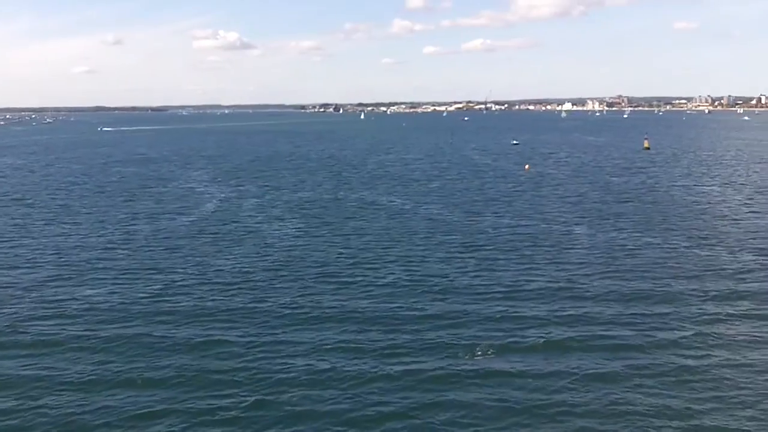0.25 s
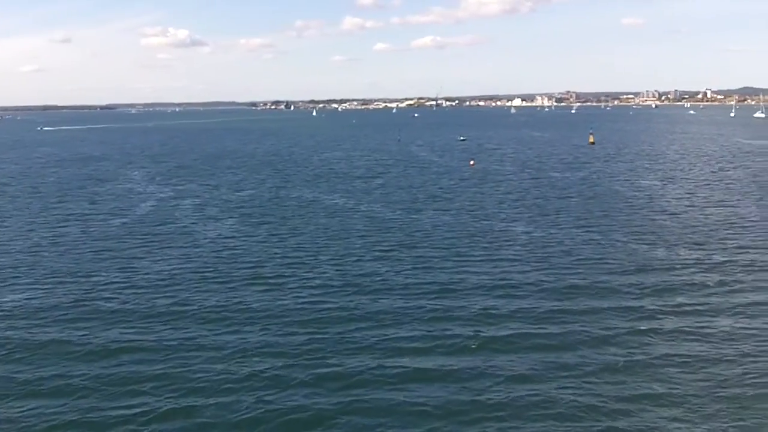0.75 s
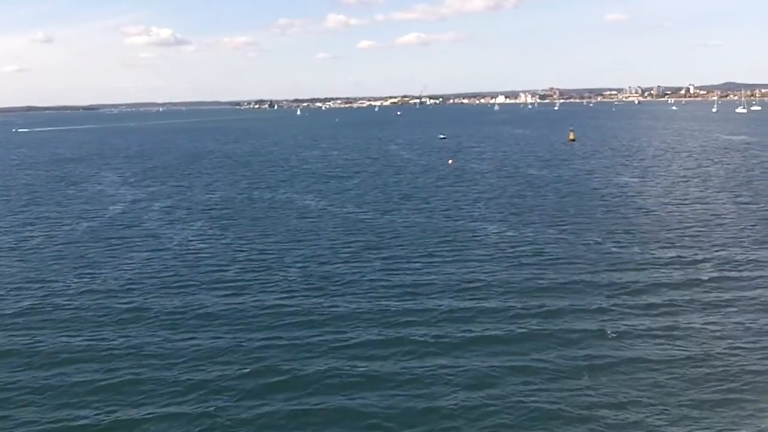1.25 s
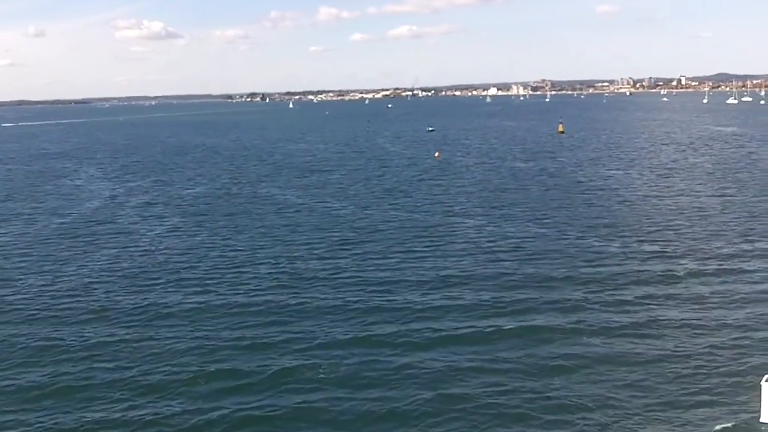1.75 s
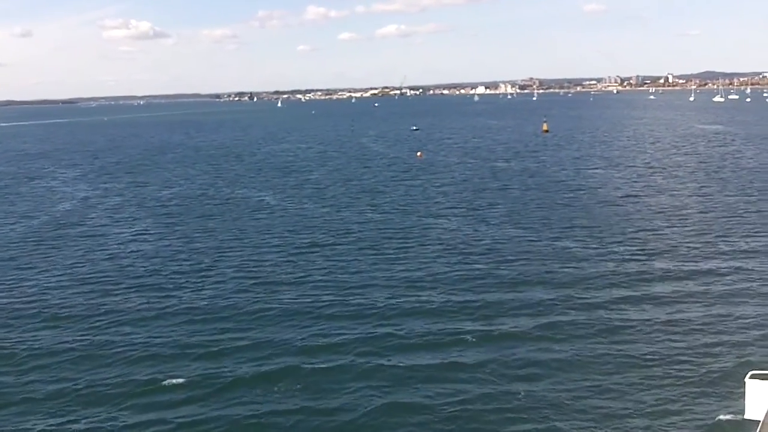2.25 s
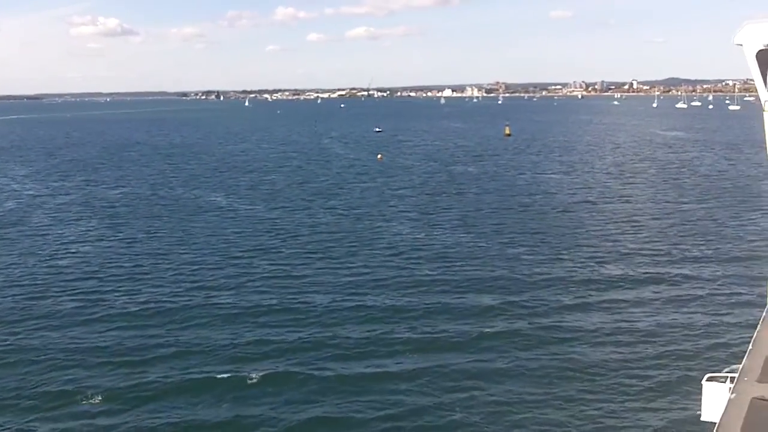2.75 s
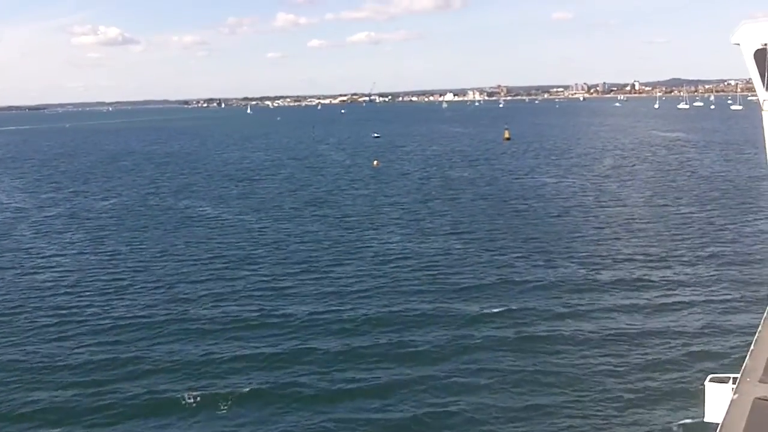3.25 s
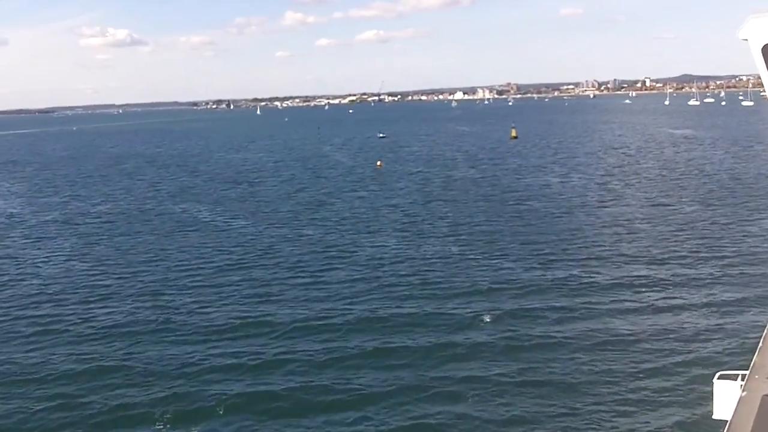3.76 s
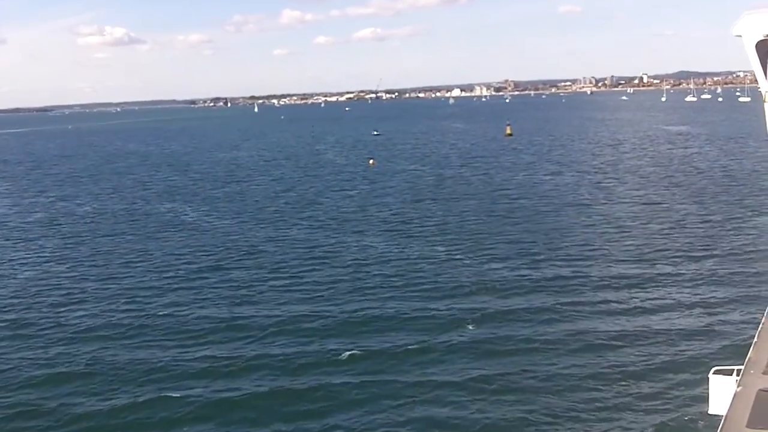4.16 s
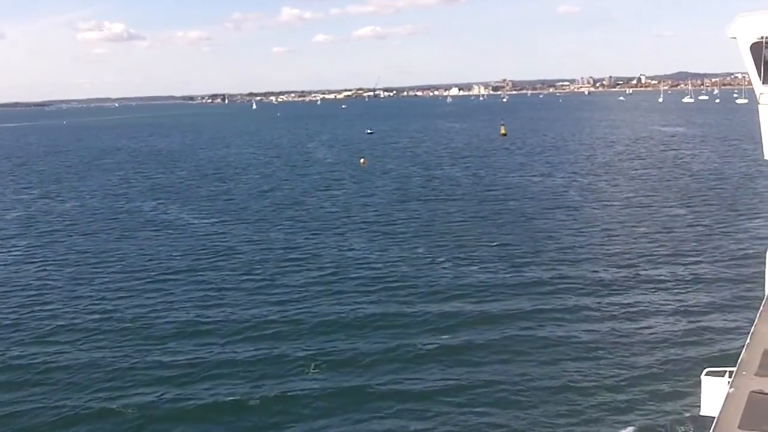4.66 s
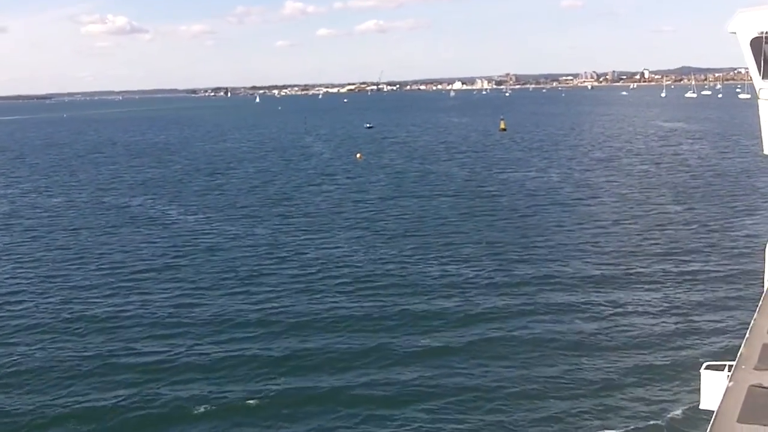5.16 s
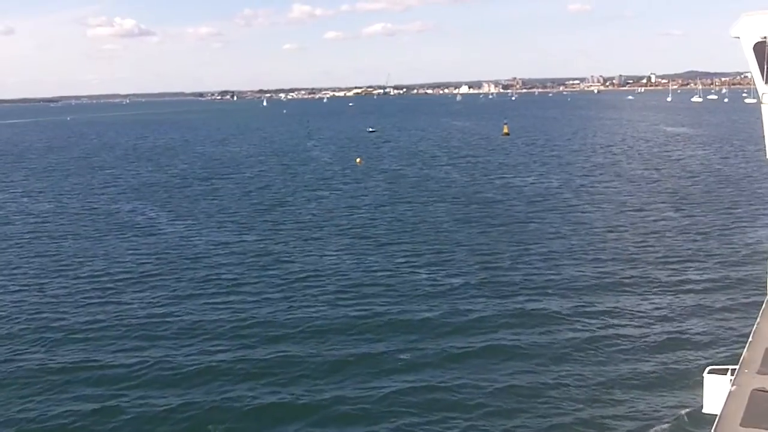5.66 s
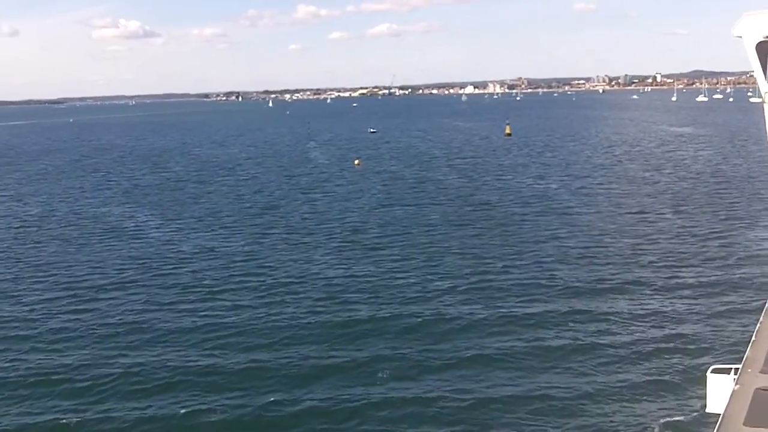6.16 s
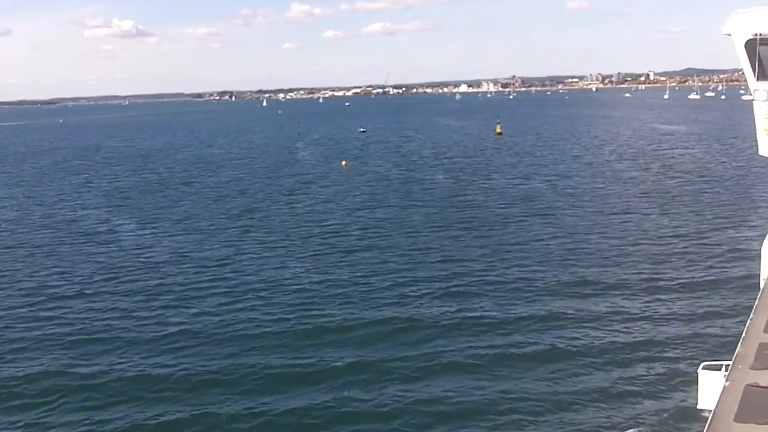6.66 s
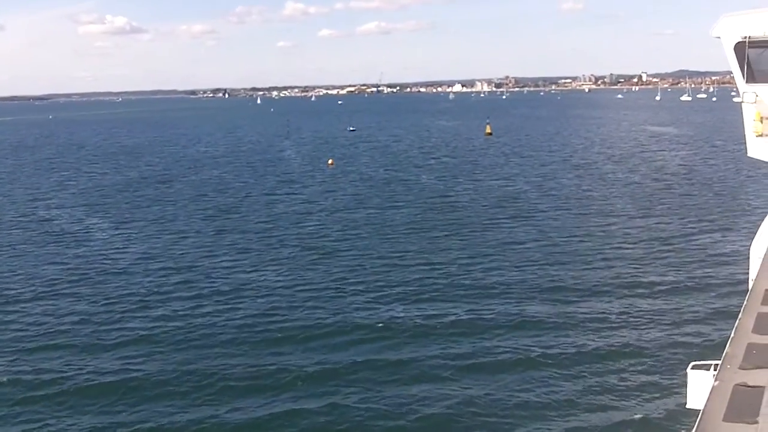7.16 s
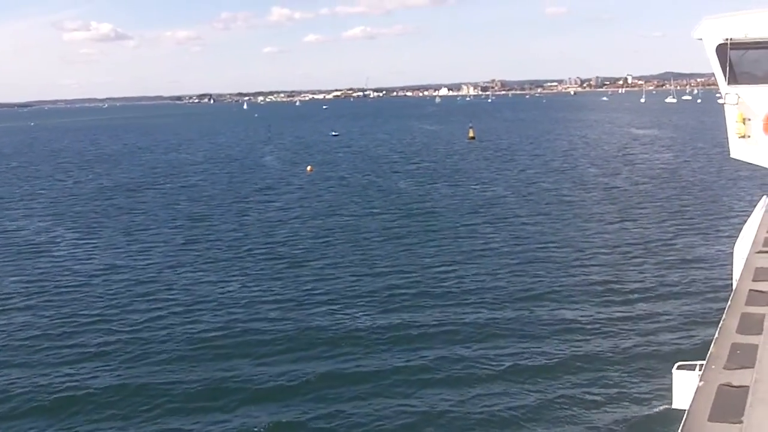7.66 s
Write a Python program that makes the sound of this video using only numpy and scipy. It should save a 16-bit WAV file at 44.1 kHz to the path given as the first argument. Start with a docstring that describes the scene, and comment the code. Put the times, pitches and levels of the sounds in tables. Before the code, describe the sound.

On the deck of a fast ferry, engines drone and a fan hums with a flutter while wind rumbles and thumps over rushing air and water.

```python
"""Side deck of a fast ferry

On the open side deck of a fast ferry crossing calm water, machinery drones as hum lines and shaped noise.
A ten-bladed fan hums in fluttering harmonics; air and wake are noise coloured by an echo off a steel wall.
Wind is lumpy low noise on the microphone, with heavier thumps; a brief, faint moan glides upward.
Later come short spurts of hiss, like spray: bursts of grainy treble noise with faint tails."""
import sys
import numpy as np
from scipy import signal
from scipy.fft import rfft, irfft, next_fast_len
from scipy.io import wavfile
from scipy.ndimage import uniform_filter1d

SR = 44100
rng = np.random.default_rng(int(sys.argv[2]) if len(sys.argv) > 2 else 0)


def transcribe(u):
    """Save the signal u as a 16-bit wav file named by the first command-line argument.

    u: samples, shape (n,) or (channels, n), limited to [-1, 1]; the rate is SR.
    q: integer samples, one column per channel.
    """
    v = np.clip(np.atleast_2d(u).T, -1, 1)
    q = np.round(v * 32767).astype(np.int16)
    wavfile.write(sys.argv[1], SR, q)


N = 349272  # length [samples]


def from_db(db):
    """Decibels to gain."""
    return 10 ** (np.asarray(db) / 20)


def rms_one(x):
    """Scale to an rms of 1."""
    return x / np.sqrt(np.mean(x ** 2) + 1e-20)


def in_time(rows):
    """Draw a (time, value) curve as straight lines, one value per sample."""
    time_s, value = np.transpose(rows)
    return np.interp(np.arange(N) / SR, time_s, value)


def bell(peak_s, half_s):
    """A smooth rise and fall around one moment, down to 1/e at half_s from the peak."""
    return np.exp(-((np.arange(N) / SR - peak_s) / half_s) ** 2)


def noise(gain_at):
    """Random noise whose amplitude follows a function of frequency; rms 1."""
    size = next_fast_len(N)
    hz = np.maximum(np.arange(size // 2 + 1) * SR / size, 1)
    spectrum = rfft(rng.standard_normal(size)) * gain_at(hz)
    return rms_one(irfft(spectrum, size)[:N])


def coloured(spectrum):
    """Noise of a given colour, falling steeply beyond the ends of the table; rms 1."""
    points, level_db = np.transpose(spectrum)

    def gain_at(hz):
        inside = np.minimum(hz / points[0], points[-1] / hz)
        ends = np.minimum(1, inside) ** 4
        return from_db(np.interp(np.log(hz), np.log(points), level_db)) * ends

    return noise(gain_at)


def drift(rate_hz):
    """Slow random movement with a spread of about 1: white noise through two equal low-pass poles."""
    step = 40  # samples between drawn points
    settle = 2000  # points dropped while the filter settles
    pole = np.exp(-2 * np.pi * rate_hz * step / SR)
    draws = rng.standard_normal(N // step + settle + 2)
    slow = signal.lfilter([1], [1, -2 * pole, pole ** 2], draws)[settle:]
    return np.interp(np.arange(N) / step, np.arange(len(slow)), rms_one(slow))


def tone(hz, flutter, rate_hz):
    """A line heard through moving air: a steady part plus a scattered part; rms about 1."""
    share = np.clip(flutter, 0, 1)
    phase = 2 * np.pi * (np.cumsum(hz) / SR + rng.random())
    steady = np.sqrt(2 * (1 - share ** 2)) * np.sin(phase)
    scattered = drift(rate_hz) * np.sin(phase) + drift(rate_hz) * np.cos(phase)
    return steady + share * scattered


def evened(x, steady_share):
    """Even out the chance swings of a noise's level, wholly or in part; rms 1."""
    own_level = np.sqrt(uniform_filter1d(x ** 2, size=SR // 8) + 1e-9)
    return rms_one(x / own_level ** np.clip(steady_share, 0, 1))


def carried(swell_db, level_db, follows):
    """Gain of a broad layer: it follows a share of the common swell and wavers a little on its own."""
    return from_db(level_db + follows * swell_db + 0.35 * drift(7.5))


def wall(x, spacing_hz, share):
    """One short echo lays evenly spaced humps over the spectrum."""
    n = np.arange(N)
    echo = np.interp(n - SR / spacing_hz, n, x, left=0)
    return rms_one(x + share * echo)


def machinery(speed, swell_db):
    """Hum lines of shafts and engines, moving in step with the fan speed, in broad drone and roar noise."""
    # hum of shafts and engines: (frequency at mean speed [Hz], level [dB])
    hum_lines = [(39.5, -32), (49.4, -35), (83, -40.5), (100.3, -45.5), (148.1, -45.5), (150.3, -42.5),
                 (197.5, -40.5), (224, -40.5), (233.5, -47), (246.9, -45.5), (266.3, -48.5), (296.2, -48.5),
                 (345.6, -48.5), (444.4, -52.5), (543, -54.5), (672, -56)]
    # colour of the low drone: (frequency [Hz], relative level per Hz [dB])
    drone_colour = [(40, -19.5), (65, -7.5), (90, -3), (112, -1), (135, -7), (170, -1.5), (205, -5),
                    (230, -5.5), (270, -6), (310, -11.5), (420, -39.5)]
    # colour of the roar above it: (frequency [Hz], relative level per Hz [dB])
    roar_colour = [(220, -31), (305, -1), (345, -1.5), (385, 1.5), (455, 1), (520, -3), (570, -5),
                   (670, -6), (760, -10), (880, -14), (1200, -27)]
    relative_speed = speed / speed.mean()
    hum = sum(from_db(db) * tone(hz * relative_speed, flutter=0.36, rate_hz=1.54) for hz, db in hum_lines)
    drone = evened(coloured(drone_colour), steady_share=0.4)
    drone = carried(swell_db, level_db=-28.5, follows=1.28) * drone
    roar = carried(swell_db, level_db=-34, follows=0.86) * coloured(roar_colour)
    return hum + drone + roar


def fan(speed, swell_db):
    """Blade tones flutter together and alone; moving air shifts their phases, intake eddies roughen them."""
    # blade tones: (multiple of the blade rate, usual level [dB], phase wander [rad],
    # roughness [spread of the gain before levelling, 0-1])
    blade_tones = [(1, -38.5, 0.33, 0.12), (2, -51, 0.45, 0.4), (3, -55, 0.44, 0.35), (4, -52.5, .65, 0.38),
                   (5, -53, 0.53, 0.48), (6, -58, .8, 0.8), (7, -66.5, 0.98, 0.8), (8, -79.5, .7, .4),
                   (9, -80.5, .7, .4), (12, -81, .5, .3)]
    # swells of the lowest blade tone: (time [s], level added [dB])
    first_tone = [(0.0, -3.5), (0.45, 0.5), (0.8, -2), (1.6, 0), (2.1, 0.5), (2.5, 1.5), (3.4, 1),
                  (3.85, -4), (4.35, -1), (4.75, -4), (4.95, -1.5), (5.3, 2), (5.82, 0.5), (5.97, -5),
                  (6.15, -0.5), (6.8, 4), (7.2, 1), (7.9, 1.5)]
    # swells of the second blade tone: (time [s], level added [dB])
    second_tone = [(0.0, -1), (0.45, 2.5), (1.1, 3.5), (1.65, 5.5), (2.5, -5), (2.95, -3), (3.08, 2),
                   (3.85, 3), (5.0, 2), (6.5, 3), (6.72, -3), (7.2, 6.5), (7.35, 8.5), (7.45, 0), (7.9, -2)]
    # swells of the third blade tone: (time [s], level added [dB])
    third_tone = [(0.0, 7), (0.45, 5.5), (0.63, -4), (0.9, 6.5), (1.2, 5), (1.6, 0), (2.1, 6.5), (2.5, 2),
                  (3.15, -0.5), (3.4, -2), (4.8, -1.5), (5.2, 1), (5.6, 1.5), (6.4, 1.5), (7.2, 0),
                  (7.9, 0)]
    blades = 10
    flutter_hz, eddy_hz = 6.5, 45
    common_flutter_db, own_flutter_db = 1.05, 1.1  # shared by all tones; each alone

    own_db = {1: in_time(first_tone), 2: in_time(second_tone), 3: in_time(third_tone)}
    blade_phase = 2 * np.pi * blades * np.cumsum(speed) / SR
    tones = np.zeros(N)
    for multiple, db, wander, rough in blade_tones:
        k = round(multiple)
        eddies = (1 + rough * drift(eddy_hz)) / np.sqrt(1 + rough ** 2)
        phase = k * blade_phase + 2 * np.pi * rng.random() + wander * drift(flutter_hz)
        line = np.sqrt(2) * np.sin(phase)
        level_db = db + own_db.get(k, 0) + own_flutter_db * drift(flutter_hz)
        tones += from_db(level_db) * eddies * line
    # the tones follow most of the common swell
    together_db = 0.91 * swell_db + common_flutter_db * drift(flutter_hz)
    return from_db(together_db) * tones


def wake(swell_db):
    """Air and churned water as shaped noise, mirrored by the wall, with a fine flickering hiss on top."""
    # colour of the rush: (frequency [Hz], relative level per Hz [dB])
    rush_colour = [(600, -15), (800, -3.5), (910, 6), (990, 9.5), (1070, 8), (1180, -3.5), (1300, 2.5),
                   (1500, -0.5), (1750, 0.5), (2000, -0.5), (2500, -2), (3000, -5), (3500, -9), (4200, -21),
                   (6000, -47.5)]
    # colour of the fine hiss: (frequency [Hz], relative level per Hz [dB])
    hiss_colour = [(2500, -12.5), (3800, -0.5), (5000, -2.5), (6200, -5), (7400, -14), (8800, -20.5),
                   (10500, -25.5), (13000, -35), (15000, -36)]
    rush = wall(coloured(rush_colour), spacing_hz=318.4, share=0.27)
    hiss = coloured(hiss_colour) * from_db(0.65 * drift(25))
    rush = carried(swell_db, level_db=-41.5, follows=0.83) * rush
    hiss = carried(swell_db, level_db=-62, follows=0.86) * hiss
    return rush + hiss


def wind(steady_share):
    """Headwind surges, drops and small random buffets shape rumble on the microphone, over a deep heave."""
    # surges and drops of the headwind: (time of the peak or dip [s], level added before levelling [dB])
    gusts = [(0.06, -3.5), (0.459, -1.5), (0.74, 3.5), (1.26, 3.5), (1.49, -7.5), (1.7, 2.5), (2.1, 6.5),
             (2.5, -1), (2.8, 0.5), (3.35, 3), (3.619, -5), (3.82, 3), (4.0, 2.5), (4.56, -5), (4.68, -8.5),
             (5.02, -2), (5.15, -7), (5.31, 5.5), (5.6, 0), (6.07, 0), (6.35, -9.5), (6.65, -4),
             (7.06, -3.5), (7.38, 5), (7.55, -5), (7.67, 3), (7.85, 6.5)]
    # colour of the rumble: (frequency [Hz], relative level per Hz [dB])
    rumble_colour = [(21, -1.5), (30, -6), (45, -11), (60, -16), (90, -27.5), (200, -50.5)]
    # colour of the slowest pressure swings: (frequency [Hz], relative level per Hz [dB])
    heave_colour = [(4, -5.5), (11, -2.5), (17, -2.5)]
    gusts_db = sum(db * bell(s, half_s=0.041) for s, db in gusts)
    buffets = from_db(gusts_db + 0.5 * drift(7.4))
    rumble = rms_one(buffets * evened(coloured(rumble_colour), steady_share))
    return from_db(-25) * rumble + from_db(-25.5) * coloured(heave_colour)


def thumps():
    """The hardest buffets thump on the microphone, reaching higher up the bass than the even rumble."""
    # hard buffets: (time of the peak [s], level [dB])
    hard_buffets = [(0.53, -24.5), (2.1, -24.5), (3.35, -22), (3.81, -22.5), (3.95, -23.5), (4.4, -32),
                    (5.3, -21), (7.35, -17)]
    # colour of a thump: (frequency [Hz], relative level per Hz [dB])
    thump_colour = [(35, -9), (60, 4), (85, 3), (120, -23)]
    envelope = sum(from_db(db) * bell(s, half_s=0.035) for s, db in hard_buffets)
    return envelope * evened(coloured(thump_colour), steady_share=0.59)


def moan():
    """A brief, faint, breathy tone that glides upward out of the roar."""
    peak_s, half_s = 3.94, 0.03
    peak_hz, rise_hz_per_s = 665, 2000
    # the glide is held still well before and after the peak
    since_s = np.clip(np.arange(N) / SR - peak_s, -2 * half_s, 2 * half_s)
    breathy = tone(peak_hz + rise_hz_per_s * since_s, flutter=0.85, rate_hz=85.0)
    return from_db(-32.5) * bell(peak_s, half_s) * breathy


def spurts(rise_s, grain_db):
    """Spurts of grainy hiss swell quickly, hold a moment and die away, each leaving a faint tail."""
    # spurts, mostly in quick pairs: (start [s], level [dB], hold [s], time to fall by 60 dB [s])
    spurt_events = [(4.734, -54, .004, .06), (4.742, -51, .002, .05), (4.752, -54, .002, .07),
                    (5.225, -49, .006, 0.04), (5.236, -50, .004, .07), (5.596, -46.5, .004, 0.06),
                    (5.612, -53, .004, .14), (5.839, -45, .009, 0.07), (5.857, -52, .005, .1),
                    (5.971, -48, .004, 0.055), (5.976, -53, .008, .07), (6.48, -51, .004, 0.04),
                    (6.495, -52, .002, .06), (7.37, -51.5, .004, 0.07), (7.394, -53, .004, .08),
                    (7.427, -49, .003, 0.04), (7.443, -52.5, .003, .09), (7.675, -45, 0.0086, 0.07),
                    (7.688, -48, .011, 0.097)]
    # colour of the spurts: (frequency [Hz], relative level per Hz [dB])
    spurt_colour = [(1500, -0.5), (3000, 7), (4500, 6), (6500, -1.5), (8500, -15), (11000, -20.5),
                    (12500, -28.5)]
    tail_db, tail_t60_s = -14, 0.3  # tail level is relative to its spurt
    t = np.arange(N) / SR
    power = np.zeros(N)
    for s, db, hold_s, t60_s in spurt_events:
        age = np.maximum(t - s, 0)
        after_s = np.maximum(age - rise_s - hold_s, 0)
        # the slower tail takes over once the main fall drops below it
        fall_db = np.maximum(-60 * after_s / t60_s, tail_db - 60 * after_s / tail_t60_s)
        rise = np.minimum(age / rise_s, 1)
        power += (rise * from_db(db + fall_db)) ** 2
    grains = from_db(grain_db * np.clip(drift(450), -2, 2))
    return np.sqrt(power) * rms_one(coloured(spurt_colour) * grains)


def stereo_trace():
    """Faint noise, mostly deep rumble with a little hiss, for the difference between left and right."""
    # colour of the difference: (frequency [Hz], relative level per Hz [dB])
    width_colour = [(6, -4), (20, 28.5), (60, 0.5), (120, -23), (220, -38.5), (600, -50), (1500, -44.5),
                    (4000, -51.5), (9000, -46.5), (13000, -65)]
    return from_db(-50.5) * coloured(width_colour)


def scene():
    """Everything reaches both channels nearly alike; only a trace of rumble and hiss differs."""
    # fan shaft speed: (time [s], turns per second [1/s])
    fan_speed = [(0, 49.37), (2.6, 49.385), (3.3, 49.29), (4.3, 49.31), (4.9, 49.38), (5.7, 49.44),
                 (6.8, 49.41), (7.9, 49.34)]
    # common swell as the air carries the sound, before each layer takes its share:
    # (time [s], level about the usual [dB])
    swell = [(0.0, -1), (0.12, 2), (0.34, 1), (0.41, 4), (0.52, 3), (0.6, -1), (0.8, 2.5), (0.88, 0),
             (1.12, 1), (1.28, -0.5), (1.42, -3.5), (1.6, 1.2), (1.8, -4), (1.96, -0.5), (2.12, -0.3),
             (2.2, -3.0), (2.52, 1.4), (2.6, 0), (2.92, -1.5), (3.12, 3), (3.4, -0.1), (3.68, 0),
             (3.8, 1.5), (3.94, 0.5), (4.03, -0.5), (4.24, 1.6), (4.36, 2), (4.52, -3.5), (4.6, -1),
             (4.76, -1.5), (4.96, 2), (5.28, 2), (5.39, -2.5), (5.45, 1), (5.72, 0), (5.83, 2), (5.89, 0.5),
             (6.2, -1.0), (6.44, 1.4), (6.6, -3), (6.92, 1), (7.0, -3.5), (7.24, 1.5), (7.4, 0),
             (7.6, -1.4), (7.75, -1.5), (7.85, -1.5), (7.92, -3)]
    speed = in_time(fan_speed)
    swell_db = in_time(swell)
    ship = machinery(speed, swell_db) + fan(speed, swell_db) + moan()
    air = wake(swell_db) + wind(steady_share=0.87) + thumps()
    mid = ship + air + spurts(rise_s=0.004, grain_db=1.5)
    side = stereo_trace()
    return np.array([mid + side, mid - side])


def record(dry):
    """A narrow notch in the treble and a steep cut of the top; a short fade ends without a click."""
    notch_hz, cutoff_hz, fade_s = 5480, 15000, 0.006
    fade = np.minimum(np.arange(N)[::-1] / (fade_s * SR), 1)
    notched = signal.lfilter(*signal.iirnotch(notch_hz, Q=6.5, fs=SR), dry * fade)
    # order 10, 0.1 dB passband ripple, 80 dB stopband
    top_cut = signal.ellip(10, 0.1, 80, cutoff_hz, fs=SR, output="sos")
    return signal.sosfilt(top_cut, notched)


dry = scene()
out = record(dry)
transcribe(out)
```